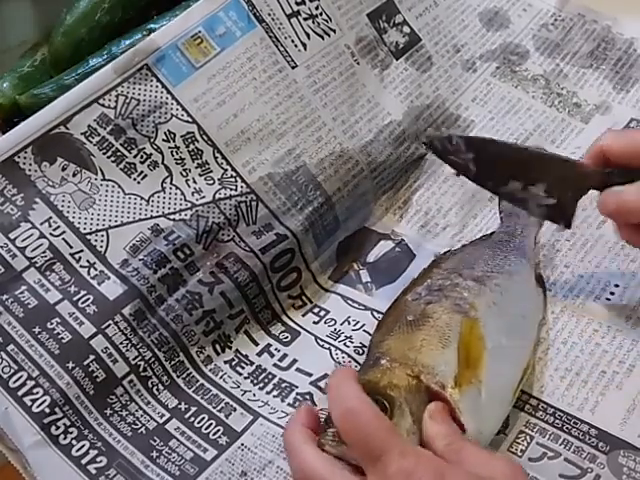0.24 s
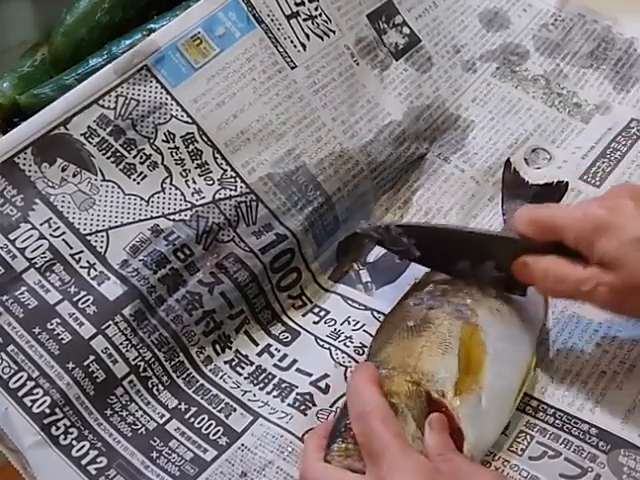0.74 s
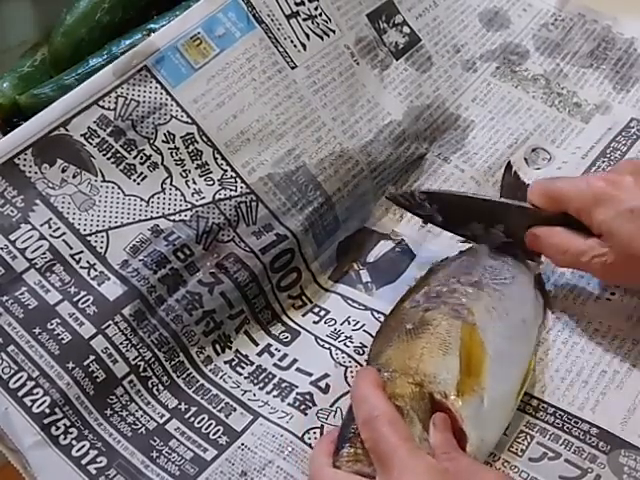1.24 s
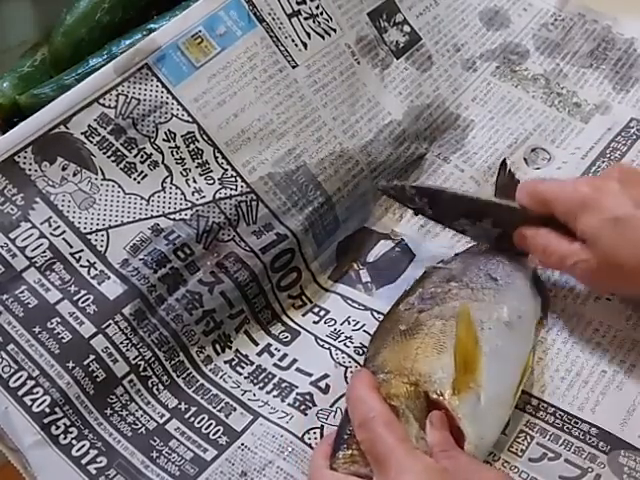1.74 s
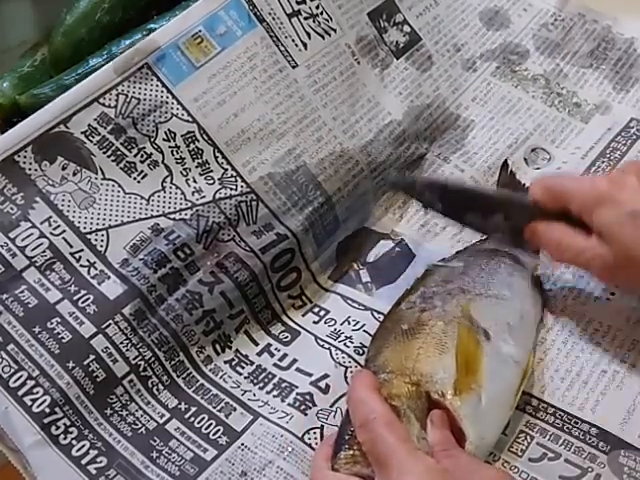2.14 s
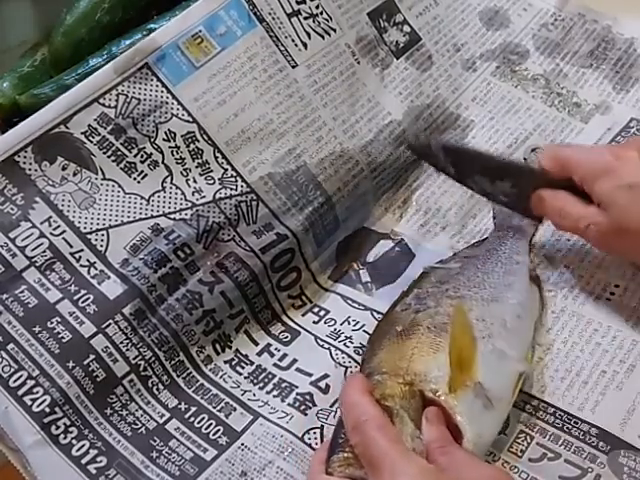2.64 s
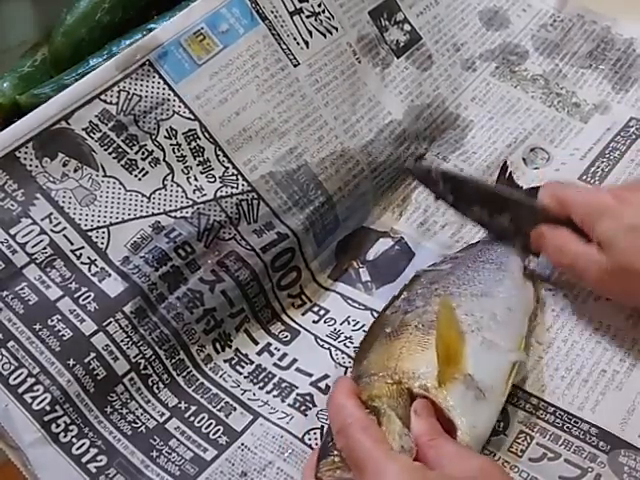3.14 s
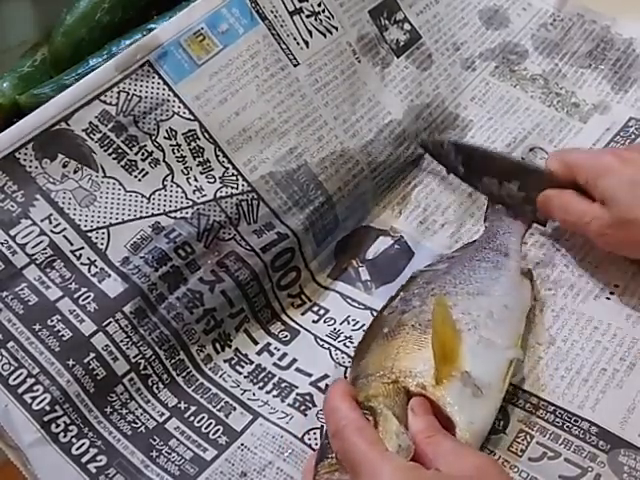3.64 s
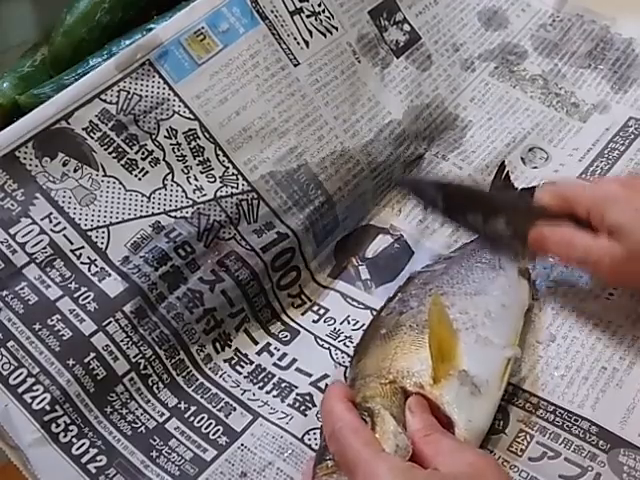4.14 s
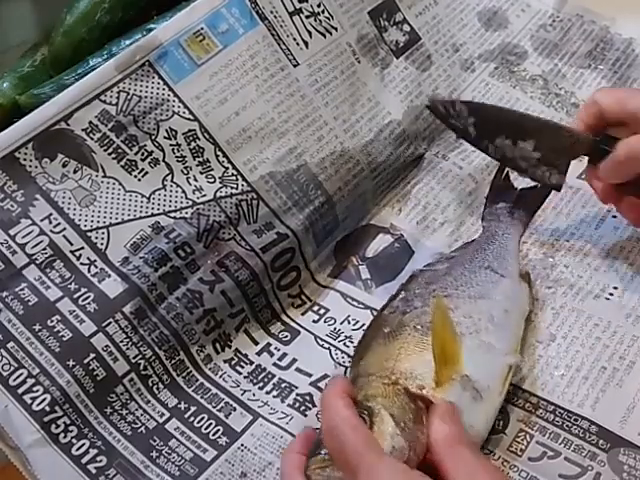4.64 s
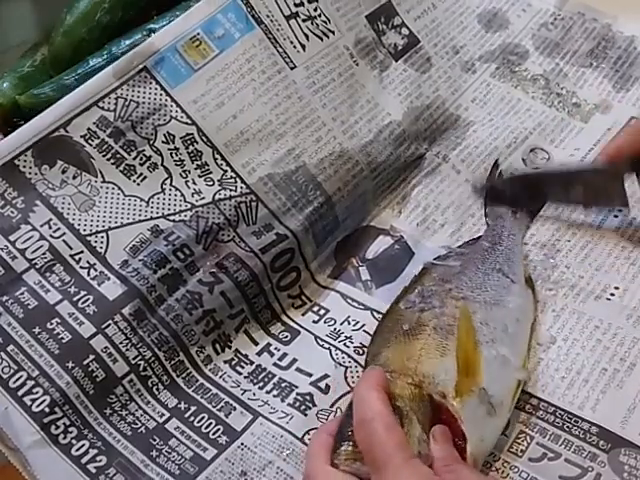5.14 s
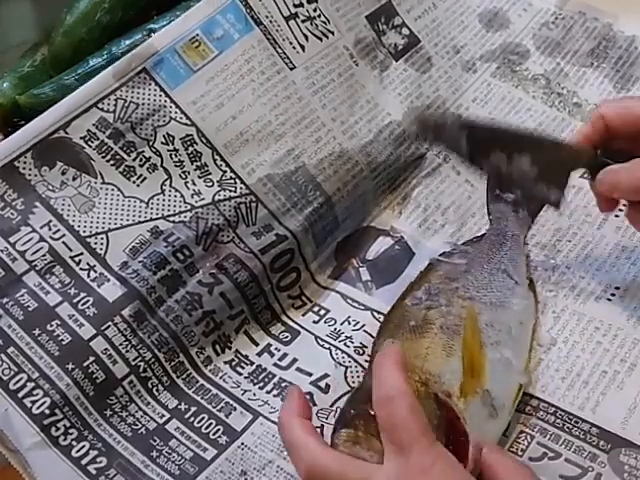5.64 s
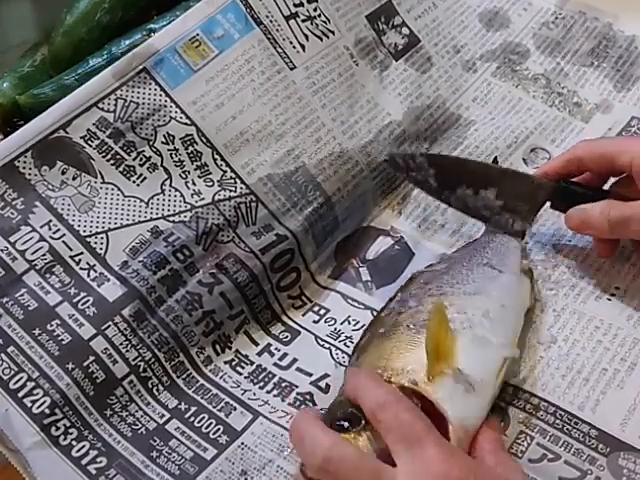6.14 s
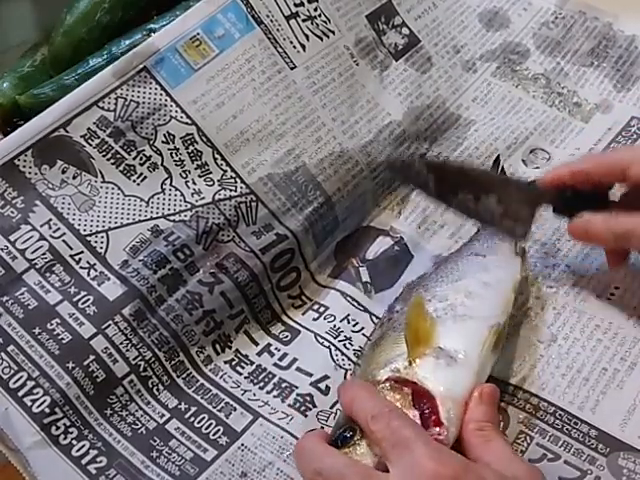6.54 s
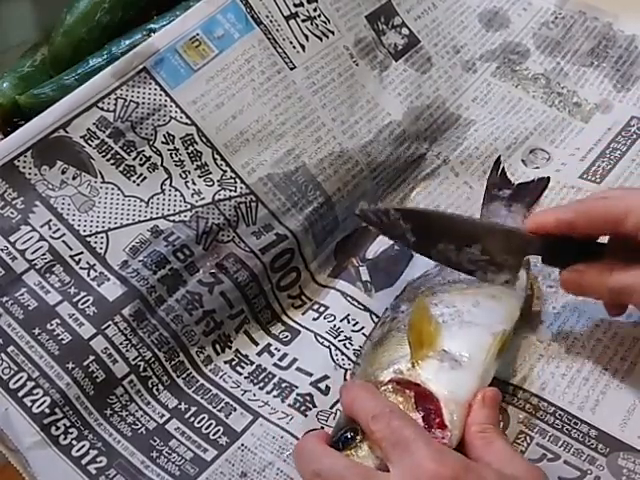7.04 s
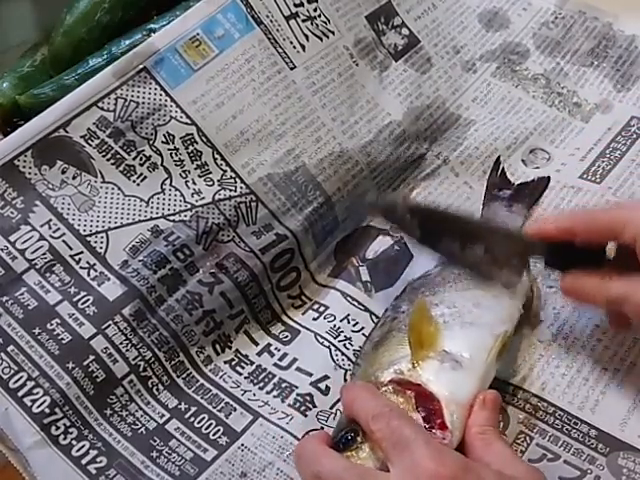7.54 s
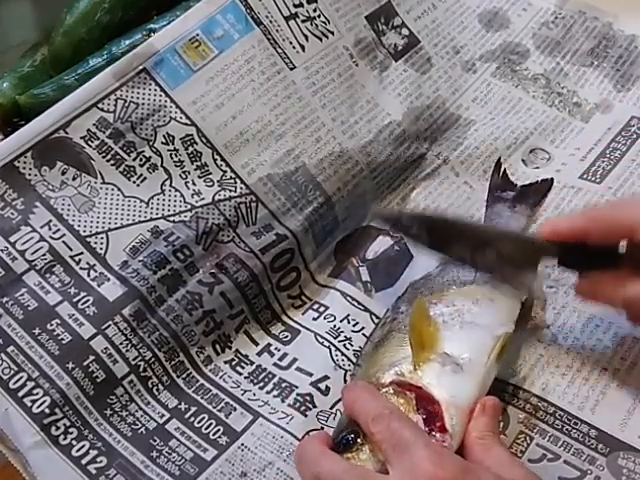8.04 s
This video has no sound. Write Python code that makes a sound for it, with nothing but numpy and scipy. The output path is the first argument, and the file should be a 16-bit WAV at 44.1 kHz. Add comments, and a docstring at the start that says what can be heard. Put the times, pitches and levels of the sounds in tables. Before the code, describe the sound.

A knife rasps scales off a fish in short quick strokes with crisp snaps and soft board thumps, while a faint car passes outside.

```python
"""Scraping scales off a fish

A kitchen knife scrapes a fish that lies on newspaper over a cutting board.
Each stroke is a dense run of tiny random clicks, the scale flicks, which also shake the fish and the board.
Sharp scale snaps, faint ticks and a few dull blade knocks are short decaying waves; further taps and thumps
set off the ringing of the blade and the board. The small kitchen answers with fading noise echoes.
Far outside a car seems to pass: noise for its tyre roar, with a falling whine."""
import sys
import numpy as np
from scipy import signal
from scipy.fft import rfft, irfft, next_fast_len
from scipy.io import wavfile

SR = 44100
rng = np.random.default_rng(int(sys.argv[2]) if len(sys.argv) > 2 else 0)


def store_wav(level_fs):
    """Save 16-bit WAV to argv[1]."""
    pcm = np.round(np.clip(np.atleast_2d(level_fs), -1, 1) * 32767)
    wavfile.write(sys.argv[1], SR, pcm.T.astype(np.int16))


N = 365148
TIME = np.arange(N) / SR  # seconds

# All levels in dB are relative; gains further on set the final mix.
# passes of the blade: start_s, length_s, rasp_db, body_db (the fish), bright_db (treble gain), body_hz (middle pitch)
BLADE_PASSES = [ (.108, 0.041, -43, -62, 2, 403), (0.185, 0.03, -60, -79, -11, 400),
                (.66, 0.07, -55, -60, -3, 900), (0.747, 0.027, -51.5, -55, 5.5, 1200),
                (0.996, 0.095, -47, -58.5, 0.5, 400), (1.369, .11, -43, -51.5, 1, 360),
                (1.474, 0.056, -46, -45, 6.5, 480), (1.808, .14, -47.5, -50.5, 4.5, 416),
                (1.953, .14, -50.5, -55.5, -0.5, 620), (2.271, .12, -43.5, -49.5, 2, 380),
                (2.425, 0.092, -43.5, -49, 2, 474), (2.814, 0.14, -45.5, -48, -0.5, 496),
                (3.165, 0.11, -43.5, -44.5, -2, 423), (3.407, 0.054, -58.5, -70, 2.5, 500),
                (3.477, 0.097, -40.5, -41, -7, 433), (3.77, 0.1, -40, -41, -10, 470),
                (4.054, 0.098, -42, -46, -9.5, 456), (4.338, 0.093, -44, -45, -5.5, 430),
                (4.886, 0.018, -46.5, -55.5, -15, 1100), (4.936, 0.13, -48.5, -49.5, -16, 655),
                (5.225, .11, -48, -47.5, -4, 740), (5.498, 0.08, -52, -48, -8, 594),
                (6.219, 0.13, -55, -71, -2.5, 600), (6.427, 0.11, -51.5, -54.5, 1, 596),
                (6.73, 0.091, -52, -52, 3.5, 540), (7.007, 0.12, -55.5, -57, 7, 493),
                (7.31, 0.087, -53, -57.5, 7.5, 600), (7.601, 0.067, -50, -49.5, -0.5, 584),
                (7.907, 0.047, -52, -54, 3.5, 850), (8.228, 0.079, -47.5, -50.5, -1.5, 460)]
# sharp snaps of stiff scales, with a few faint ticks and dull knocks of the blade: start_s, level_db, pitch_hz
SNAPS_TICKS_KNOCKS = [ (0.1048, -14, 7200), (0.135, -15.5, 4560), (0.1531, -15, 7000), (.442, -43.5, 1570),
                      (.696, -25.5, 3800), (0.707, -21.5, 7100), (.746, -20, 9500), (1.0522, -6, 9500),
                      (1.221, -31.5, 8600), (1.328, -34, 9000), (1.3755, -24, 3650), (1.479, -6, 7300),
                      (1.5375, -7.5, 3680), (1.5404, -10.5, 4400), (2.0324, -5.5, 4040),
                      (2.446, -1.5, 7100), (2.4987, 1, 3020), (2.7635, -27, 2650), (2.94, -23, 6000),
                      (2.964, -22, 4470), (3.745, -33.5, 1800), (4.153, -20.5, 3680), (4.405, -21.5, 3277),
                      (5.226, -27, 2370), (6.08, -38.5, 6000), (6.3068, -24, 4440), (6.438, -24, 4570),
                      (6.7516, -23, 3460), (6.7795, -18, 9600), (7.325, -22, 9300), (7.461, -30, 5030)]
# the blade knocks and rings: start_s, level_db
BLADE_KNOCKS = [(.1053, -27), (.153, -49), (1.061, -36), (2.762, -51)]
# ringing tones of the blade: pitch_hz, level_db, t60_s (time to fade by 60 dB)
BLADE_TONES = [(2655, -8, 0.065), (2680, -44, 0.23), (2850, -38, 0.018), (9000, -1, 0.014)]
# the fish slips and bumps onto the board: start_s, level_db
FISH_THUMPS = [(1.062, -41.5), (1.542, -38), (2.04, -42), (2.504, -34), (2.772, -32), (5.02, -43),
               (5.253, -41.5), (5.507, -37.5), (6.53, -43.5)]
# ringing tones of the board on the counter: pitch_hz, level_db, t60_s
BOARD_TONES = [(63, -23.5, 0.17), (87, -11.5, 0.58), (119.6, 1.5, 0.24), (155, -8, .1), (205, -10.5, 0.055),
               (280, -6, 0.065)]
# tone colour of the rasp, also used for the paper: frequency_hz, level_db
RASP_COLOUR = [(500, -28), (1200, -11), (1850, -8), (2450, 0), (3300, -0.5), (4300, -1), (5600, -2.5),
               (7300, -3), (8600, -1), (9900, 1), (11200, -6.5), (13400, 0), (16000, -10.5)]
# tone colour of the tugs on the flesh: frequency_hz, level_db
FLESH_COLOUR = [(30, -29), (100, -8), (220, -4), (320, 0), (410, 1), (540, -2), (700, 2.5), (920, -1),
                (1400, -3.5), (1900, -9), (2400, -13), (4000, -17.5), (12000, -38)]
# tone colour of the car's tyre roar: frequency_hz, level_db
CAR_COLOUR = [(80, -21), (200, 0), (380, -7), (520, -2), (750, -6), (1000, -2.5), (1300, -3.5), (1700, -8),
              (2500, -11.5), (4500, -24), (9000, -38)]
# tone colour of the room's hush: frequency_hz, level_db
HUSH_COLOUR = [(15, -51), (25, -26), (92, -5), (123, 0), (170, -10.5), (212, -9), (489, -15.5), (624, -14),
               (1260, -22), (4140, -25.5), (4870, -25), (7710, -29.5), (8590, -24.5), (14000, -31),
               (16000, -44)]
# level difference between the two ears of the scene: frequency_hz, left_minus_right_db
LEFT_RIGHT = [(100, -3), (380, -3.5), (680, -5.5), (1200, -3), (2400, -3.5), (4400, -2.5), (7000, -2.5),
              (8500, -10), (9800, -0.5), (11500, -2.5), (13400, -1.5), (15500, -1)]
# how alike sound from all sides is at left and right: frequency_hz, correlation (no unit)
LIKENESS_BY_PITCH = [(100, 0.71), (300, 0.94), (600, 0.52), (1100, 0), (16000, 0)]
# how long the kitchen rings: frequency_hz, t60_s
KITCHEN_RING = [(150, 0.38), (1000, 0.22), (4000, 0.28), (15000, 0.29)]
# the tyre whine falls as the car goes by: time_s, pitch_hz, level_db (within the car's sound)
WHINE_PATH = [(5.2, 1400, -25), (5.7, 1312, -7.5), (6.15, 1215, -3), (6.6, 1088, -7.5), (7.5, 1034, -10)]
# hands shifting on the newspaper: time_s, level_db
PAPER_LEVEL = [(0, -73), (.55, -78.5), (1.3, -66.5), (2.2, -75.5), (5.5, -77.5), (6, -70), (8.28, -61)]
# times when the blade is not lifted clear between passes: from_s, to_s
BLADE_STAYS_LOW = [(.9, 1.4), (6.6, 8.28)]

# in each pass the pressure swells to a crest, then eases: crest as a share of the pass, changes in dB
CREST_SHARE, SWELL_DB, EASE_DB = 0.53, 6, 5
# a low blade brushes the skin on its way back before a pass
BRUSH_LEAD_S, BRUSH_S = 0.14, 0.051
BRUSH_RASP_DB, BRUSH_BODY_DB, BRUSH_BRIGHT_DB, BRUSH_HZ = -66.5, -73, 2.5, 700
# the edge catches its first scale with a tick: dB added to the pass's listed rasp level
BITE_DB, BITE_HZ = 5, 3500
# loose scales land with faint ticks; the spread goes up and down from the middle level
STRAYS_PER_S, STRAY_DB, STRAY_SPREAD_DB, STRAY_HZ = 2.5, -50, 7, 4500
# the car: nearest moment, time scale of drawing away, level when nearest, power of distance by which it fades
CAR_NEAREST_S, CAR_PASS_S, CAR_DB, CAR_FALLOFF = 6.04, 0.78, -58, 1.49
# the flesh thickens toward the head, so its pitch falls by this much over a pass
SAG_OCTAVES = 0.65
# the flesh resounds more over the hollow belly: place and width as shares of the pass, extra dB
BELLY_AT, BELLY_WIDTH, BELLY_DB = 0.59, 0.18, 5.5
# the blade lands softly just before it bites: dB added to the pass's listed body level
LANDING_LEAD_S, LANDING_DB = 0.0119, -1.5
CUTOFF_HZ = 16100


def from_db(db):
    """Turn decibels into a gain."""
    return 10 ** (np.asarray(db) / 20)


def rms_one(x):
    """Scale a sound to an average strength (rms) of one."""
    return x / np.sqrt(np.mean(x ** 2) + 1e-20)


def at_hz(points, hz):
    """Read a table between its rows, with frequency spaced by ratio as we hear it."""
    knots, values = np.transpose(points)
    return np.interp(np.log(hz + 1), np.log(knots), values)


def colour(x, spectrum, share=1, size=4096):
    """Filter a sound to follow a share of a dB table, answering as promptly as possible (minimum phase)."""
    gains = from_db(share * at_hz(spectrum, np.fft.rfftfreq(size, 1 / SR)))
    # folding the cepstrum makes the filter respond only after its input
    cepstrum = irfft(np.log(gains))
    cepstrum[1:size // 2] *= 2
    cepstrum[size // 2 + 1:] = 0
    response = irfft(np.exp(rfft(cepstrum)))
    return signal.oaconvolve(np.atleast_2d(x), response[None], axes=1)[:, :N]


def butter_filter(x, order, hz, kind="low"):
    """Remove the frequencies outside the wanted range with a smooth filter."""
    return signal.sosfilt(signal.butter(order, hz, kind, fs=SR, output="sos"), x)


def resonance(x, hz, q):
    """Pick out the part of a sound near one pitch, as a resonating body does."""
    return signal.lfilter(*signal.iirpeak(hz, q, fs=SR), x)


def delayed(x, lag_s):
    """Read a sound later by a fixed or moving lag."""
    return np.interp(TIME - lag_s, TIME, x)


def wander(rate):
    """Drift smoothly between random values, rate of them per second, with a spread of one."""
    knots = rng.standard_normal(N // 10)
    return rms_one(np.interp(TIME * rate, np.arange(len(knots)), knots))


def diffuse(size):
    """Noise from all sides: its likeness at left and right depends on frequency."""
    alike = np.clip(at_hz(LIKENESS_BY_PITCH, np.fft.rfftfreq(size, 1 / SR)), -1, 1)
    mid, side = rfft(rng.standard_normal((2, size)))
    return irfft(np.sqrt(1 + alike) * mid + np.sqrt(1 - alike) * side * [[1], [-1]], size)


def flicks(per_s, spread_db, clump_db, clump_rate):
    """Random clicks, many small and a few large, bunched by a wandering level."""
    sizes = from_db(spread_db * np.minimum(rng.exponential(1, N), 4))
    signs = rng.choice([-1, 1], N)
    happens = rng.random(N) < per_s / SR
    return rms_one(sizes * signs * happens * from_db(clump_db * wander(clump_rate)))


def blows(rows):
    """Place one sharp impulse for each row: start_s, level_db."""
    out = np.zeros(N)
    for start_s, level_db in rows:
        out[round(start_s * SR)] += from_db(level_db)
    return out


def ring(force, tones):
    """A force sets off each tone of a solid body as a dying sine wave."""
    out = 0
    for hz, db, t60_s in tones:
        decay = np.exp(-np.log(1000) / (t60_s * SR))
        turn = 2 * np.pi * hz / SR
        recursion = [1, -2 * decay * np.cos(turn), decay * decay]
        # the tiny offset avoids very slow arithmetic near zero
        out = out + from_db(db) * signal.lfilter([0, np.sin(turn)], recursion, force + 1e-18)
    return out


def room_hush():
    """The quiet of the room is steady noise from all sides."""
    return from_db(-64.3) * rms_one(colour(diffuse(next_fast_len(N)), HUSH_COLOUR))


def car_gain():
    """A car driving by in a straight line fades with its distance."""
    distance = np.hypot(1, (TIME - CAR_NEAREST_S) / CAR_PASS_S)
    return from_db(CAR_DB) / distance ** CAR_FALLOFF


def distant_car():
    """Tyre roar is coloured noise; the whine is a narrow band of noise around a falling pitch."""
    knots, whine_hz, whine_db = np.transpose(WHINE_PATH)
    narrow = butter_filter(rng.standard_normal((2, N)), 2, 70)
    phase = 2 * np.pi * np.cumsum(np.interp(TIME, knots, whine_hz)) / SR
    whine = from_db(np.interp(TIME, knots, whine_db)) * rms_one(narrow * np.cos(phase))
    roar = from_db(-0.5) * rms_one(colour(diffuse(next_fast_len(N)), CAR_COLOUR))
    return car_gain() * (roar + whine)


def background():
    """The hush and the car together, with the deepest bass removed."""
    return butter_filter(distant_car() + room_hush(), 2, 45, "high")


def paper():
    """The damp newspaper rustles under the hands: bunched clicks with a changing level."""
    creases = flicks(per_s=730, spread_db=3.5, clump_db=6.5, clump_rate=11)
    creases = rms_one(colour(creases, RASP_COLOUR))
    return from_db(np.interp(TIME, *np.transpose(PAPER_LEVEL)) + 0.5) * creases


def landings():
    """The harder the pass, the harder the blade lands: start_s, level_db."""
    return [(start - LANDING_LEAD_S, body_db + LANDING_DB) for start, _, _, body_db, *_ in BLADE_PASSES]


def board(drag):
    """Soft thumps and the blade's drag make the board boom; it gives off little deep bass."""
    soft = butter_filter(blows(FISH_THUMPS + landings()), 2, 130)
    thumps = from_db(-3.0) * ring(soft, BOARD_TONES)
    rubbing = from_db(-9.5) * drag * rms_one(ring(rng.standard_normal(N), BOARD_TONES))
    return butter_filter(thumps + rubbing, 6, 56, "high")


def small_ticks():
    """A tick at the start of each pass, and loose scales landing at random: start_s, level_db, pitch_hz."""
    bites = [(start, rasp_db + BITE_DB, BITE_HZ) for start, _, rasp_db, *_ in BLADE_PASSES]
    chance = rng.uniform(-1, 1, (200, 3))
    times = np.cumsum(1 + chance[:, 0]) / STRAYS_PER_S
    strays = []
    for start, (_, size, pitch) in zip(times, chance):
        if start < TIME[-1]:
            strays.append((start, STRAY_DB + STRAY_SPREAD_DB * size, STRAY_HZ * 2 ** pitch))
    return bites + strays


def snaps_and_ticks(sharpness, crack, size=512):
    """Each snap, tick or dull knock is a crack and a very short ring; high ones give little bass."""
    out, t = np.zeros(N + size), np.arange(size) / SR
    for start, db, hz in SNAPS_TICKS_KNOCKS + small_ticks():
        pulse = np.cos(2 * np.pi * hz * t) * np.exp(-np.pi * hz * t / sharpness)
        pulse[0] += crack
        pulse = signal.lfilter(*signal.butter(1, hz * 0.13, "high", fs=SR), pulse)
        at = round(start * SR)
        out[at:at + size] += from_db(db) * pulse / (1 + crack)
    out = out[:N]
    # the flat of the blade and the board throw each one back almost at once
    return out + 0.099 * delayed(out, 0.00023) - 0.37 * delayed(out, 0.00058)


def blade_knocks():
    """Each knock sets the metal blade ringing."""
    return ring(blows(BLADE_KNOCKS), BLADE_TONES)


def passes():
    """List the scraping passes and the light brushes on the way back."""
    brushes = []
    for start, *_ in BLADE_PASSES:
        if any(low_from < start < low_to for low_from, low_to in BLADE_STAYS_LOW):
            brushes.append((start - BRUSH_LEAD_S, BRUSH_S, BRUSH_RASP_DB, BRUSH_BODY_DB,
                            BRUSH_BRIGHT_DB, BRUSH_HZ))
    return BLADE_PASSES + brushes


def stroke_gains(bite_s, lift_s):
    """Pressure of each stroke: the blade touches, presses hardest at the crest and lifts."""
    strokes = []
    for start, length, *sound in passes():
        span = slice(max(0, int((start - .04) * SR)), int((start + length + .08) * SR))
        t = TIME[span] - start
        share = t / length
        before_crest = np.clip(1 - share / CREST_SHARE, 0, 1)
        after_crest = np.clip((share - CREST_SHARE) / (1 - CREST_SHARE), 0, 1)
        contact = np.exp(np.minimum(t, 0) / bite_s - np.maximum(t - length, 0) / lift_s)
        press = contact * from_db(-EASE_DB * after_crest ** 2.4 - SWELL_DB * before_crest ** 1.85)
        strokes.append((span, press, np.clip(share, 0, 1), *sound))
    return strokes


def blade_edge(width_s, bounce_s, bounce, shift_db, count=4):
    """Places along the edge take turns to catch, each with its own direction and moving echo off the blade."""
    out = np.zeros((2, N))
    for place in np.linspace(-1, 1, count):
        bending = flicks(per_s=1100, spread_db=2.5, clump_db=3.0, clump_rate=200)
        tearing = flicks(per_s=50, spread_db=1.4, clump_db=0.5, clump_rate=24)
        grains = (bending + 0.79 * tearing) * from_db(shift_db * wander(35))
        grains = grains - bounce * delayed(grains, bounce_s * from_db(3 * wander(14)))
        # left and right hear each place at slightly different times
        out += [delayed(grains, 1 / SR + place * width_s), grains]
    return rms_one(out * from_db(0.75 * wander(170)))


def shifting(x, low_hz, high_hz, depth_db, rate, count=6):
    """Broad resonances swell and fade, each on its own, as the contact slides along the fish."""
    out = x
    for hz in np.geomspace(low_hz, high_hz, count):
        out = out + resonance(x, hz, 2.8) * (from_db(depth_db * wander(rate)) - 1)
    return rms_one(out)


def flesh(tugs, along, body_hz, q):
    """A broad resonance that sinks in pitch along the stroke and swells over the belly."""
    early = resonance(tugs, body_hz * 2 ** (SAG_OCTAVES / 2), q)
    late = resonance(tugs, body_hz * 2 ** (-SAG_OCTAVES / 2), q)
    belly = from_db(BELLY_DB * np.exp(-((along - BELLY_AT) / BELLY_WIDTH) ** 2))
    return belly * (np.sqrt(1 - along) * early + np.sqrt(along) * late)


def scraping(strokes):
    """Scale flicks make a bright rasp; tugs make the flesh resound, and the blade drags on the board."""
    grains = blade_edge(width_s=.00003, bounce_s=0.0004105, bounce=0.42, shift_db=1.1)
    grains = rms_one(colour(grains, RASP_COLOUR))
    dull = butter_filter(grains, 1, 5500)
    tugs = flicks(per_s=2200, spread_db=2.5, clump_db=3.0, clump_rate=150)
    tugs = rms_one(colour(tugs, FLESH_COLOUR))[0]
    grains = shifting(grains, low_hz=1860, high_hz=13500, depth_db=2.0, rate=70)
    tugs = shifting(tugs, low_hz=227, high_hz=1450, depth_db=2.5, rate=32)
    rasp, body, drag = np.zeros((2, N)), np.zeros(N), np.zeros(N)
    for span, press, along, rasp_db, body_db, bright_db, body_hz in strokes:
        treble = grains[:, span] - dull[:, span]
        rasp[:, span] += press * from_db(rasp_db + 2.0) * (dull[:, span] + from_db(bright_db) * treble)
        # the flesh answers more steeply to pressure, at a pitch set by the spot under the blade
        hollow = flesh(tugs[span], along, body_hz, q=2.42)
        body[span] += press ** 1.67 * from_db(body_db) * (0.75 * tugs[span] + 0.83 * hollow)
        drag[span] += press * from_db((rasp_db + body_db) / 2)
    return rasp, body, drag


def kitchen(x, wet_db, near_db, near_s, size=24000):
    """Dense echoes from the counter and things close by, then the room's tail, dying band by band."""
    t, noise = np.arange(size) / SR, diffuse(size)
    edges = np.geomspace(40, 18000, 9)
    tail = 0
    for low, high in zip(edges, edges[1:]):
        band = butter_filter(diffuse(size), 2, [low, high], "band")
        tail = tail + band * np.exp(-np.log(1000) * t / at_hz(KITCHEN_RING, np.sqrt(low * high)))
    # small things nearby throw back only the short waves
    near = butter_filter(noise * np.exp(-t / near_s) * (t > .0004), 2, 1400, "high")
    response = from_db(wet_db) * rms_one(tail * (t > .004)) + from_db(near_db) * rms_one(near)
    return signal.oaconvolve(np.atleast_2d(x), response / np.sqrt(size), axes=1)[:, :N]


def scene():
    """The work lies a little to the right: its sound reaches the left later and weaker."""
    rasp, body, drag = scraping(stroke_gains(bite_s=0.0078, lift_s=0.015))
    handling = paper()[0] + blade_knocks()
    cracks = from_db(-0.03) * snaps_and_ticks(sharpness=1.47, crack=0.44)
    centre = handling + cracks + board(drag)
    echoes = kitchen(handling + body + rasp[1], wet_db=-7.0, near_db=-3.5, near_s=0.0027)
    echoes = echoes + kitchen(cracks, wet_db=-11.0, near_db=-1.5, near_s=0.0017)
    # the fish's flank lies further to the side than the blade
    direct = np.array([delayed(centre, 1 / SR) + delayed(body, 0.00017), centre + body])
    left, right = direct + rasp + echoes
    # half of the level difference goes to each side
    work = np.vstack([colour(left, LEFT_RIGHT, share=1 / 2), colour(right, LEFT_RIGHT, share=-1 / 2)])
    return from_db(-1.48) * work + background()


def record(dry):
    """Cut the highest treble steeply."""
    return signal.sosfilt(signal.ellip(10, .1, 80, CUTOFF_HZ, fs=SR, output="sos"), dry)


dry = scene()
out = record(dry)
store_wav(out)
```